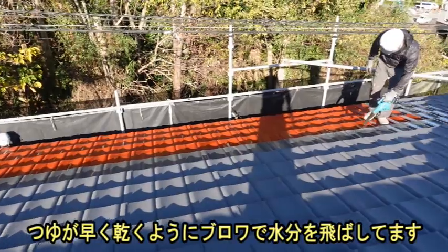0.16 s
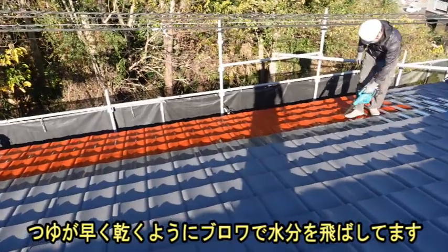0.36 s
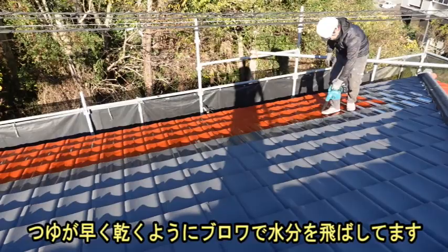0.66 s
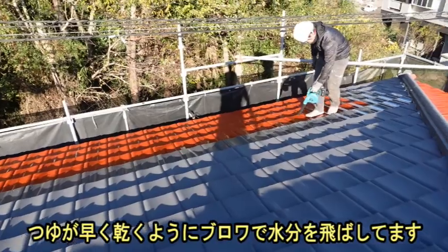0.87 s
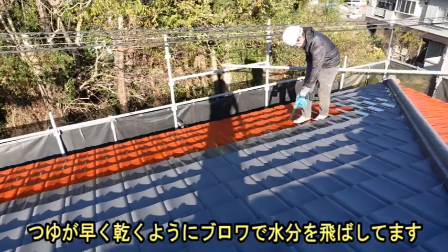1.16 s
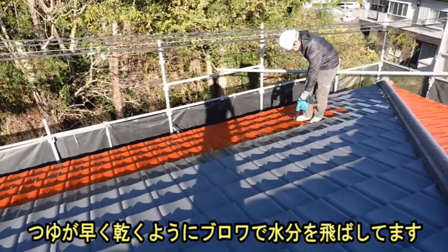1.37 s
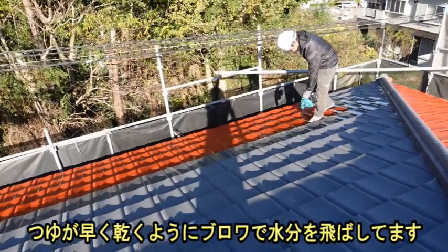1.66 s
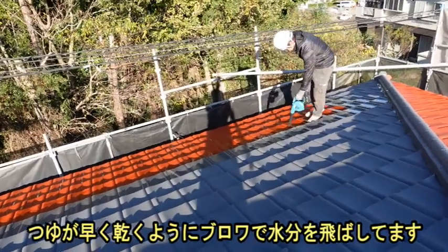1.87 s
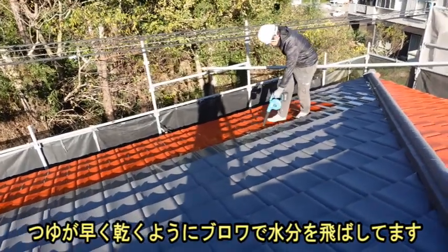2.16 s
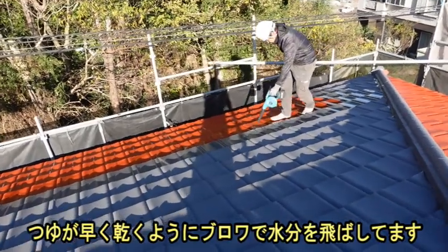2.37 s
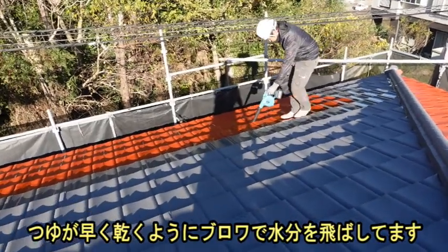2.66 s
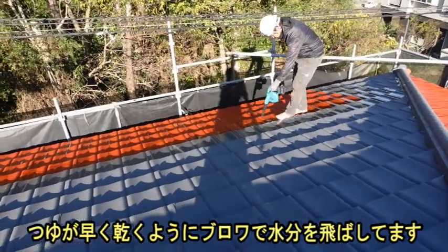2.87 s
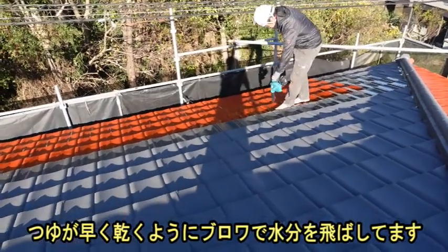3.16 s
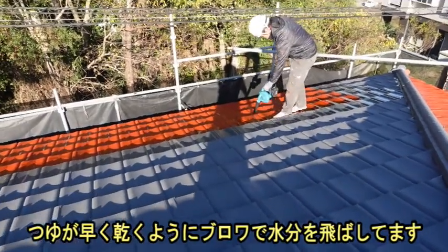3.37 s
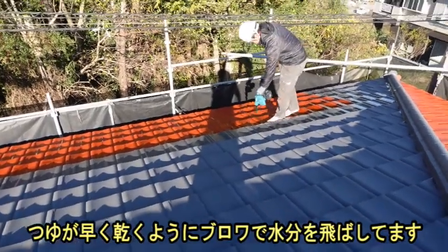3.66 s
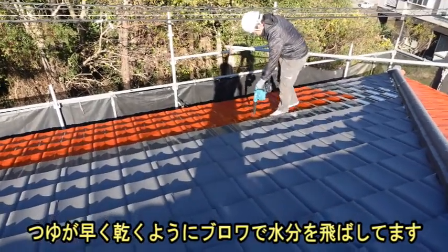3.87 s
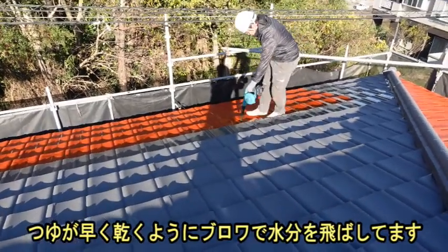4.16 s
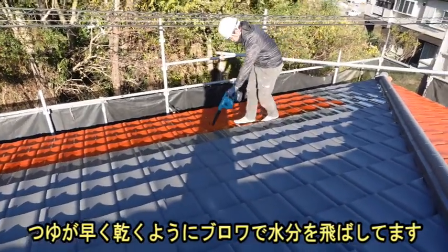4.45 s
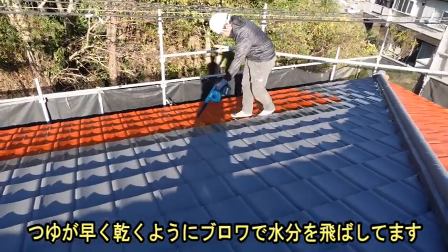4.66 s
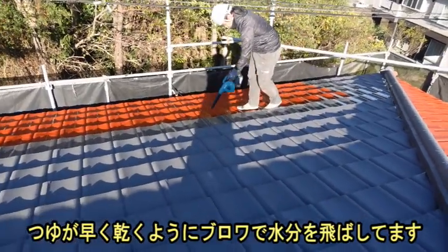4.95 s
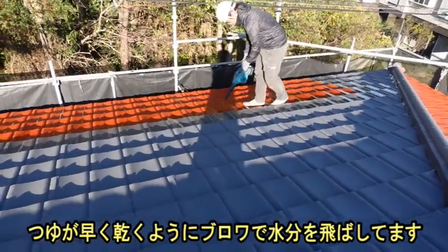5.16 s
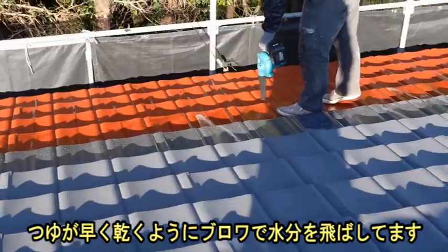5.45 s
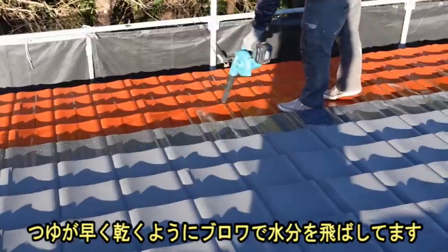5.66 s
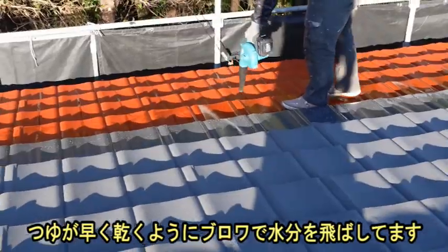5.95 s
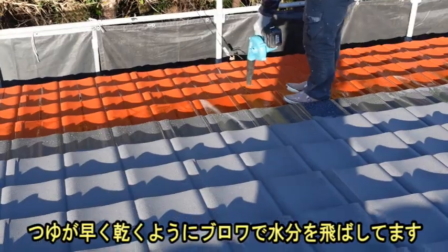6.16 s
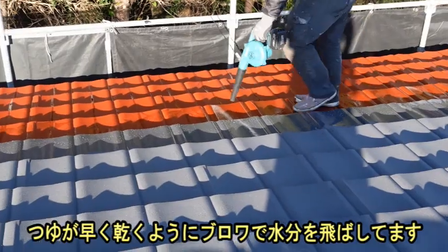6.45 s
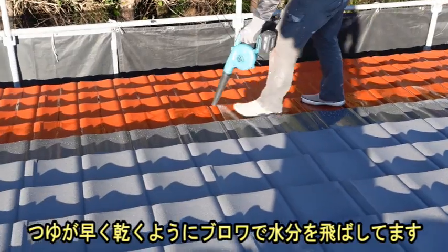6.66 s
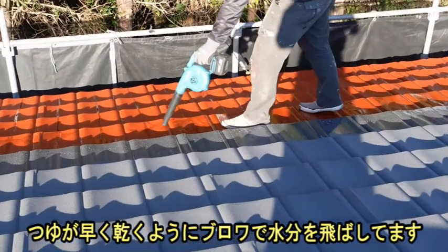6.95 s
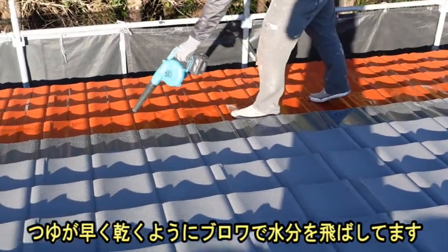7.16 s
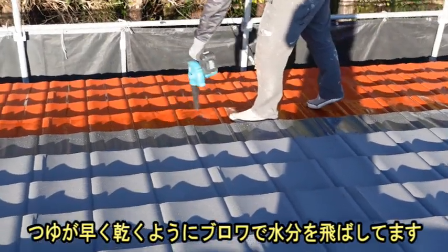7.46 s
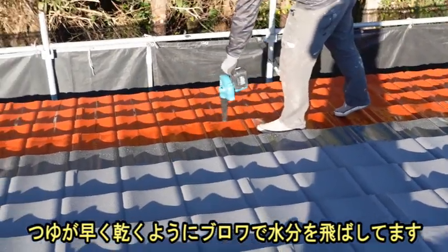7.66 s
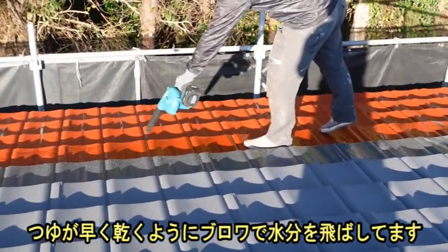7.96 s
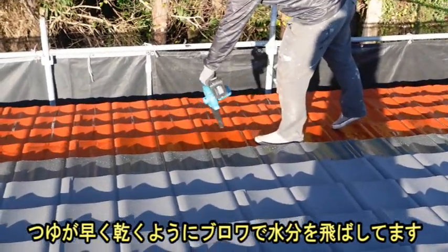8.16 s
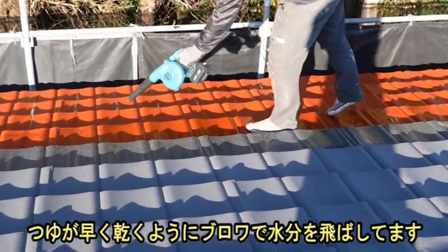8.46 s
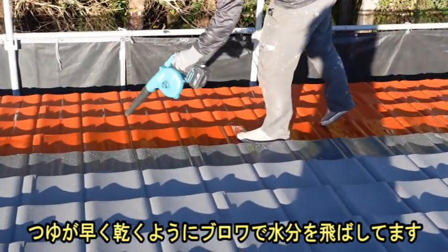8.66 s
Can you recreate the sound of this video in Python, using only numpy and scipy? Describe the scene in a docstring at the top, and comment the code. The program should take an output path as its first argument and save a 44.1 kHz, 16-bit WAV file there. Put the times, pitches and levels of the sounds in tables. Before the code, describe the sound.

A cordless blower runs outdoors on a tiled metal roof, its high fan whine riding over rushing, hissing air. It dips briefly, returns to full speed, then slows for longer with a thin squeal. The speed jumps with a faint thump and climbs again, dips once more and finally starts winding down. The sound drifts from slightly right to the middle, with almost no echo.

```python
"""Outdoors on a tiled metal roof, a cordless blower dries the tiles, its trigger squeezed and eased.
The nine-bladed fan whines over air that howls at the intake, rushes through duct and nozzle and roars
on the tiles. Pitch and loudness ride the shaft speed; at low speed a thin squeal comes out, probably
from a bearing. Partway through, the speed leaps up at once with a soft thump."""
import sys
import numpy as np
from scipy import signal
from scipy.fft import rfft, irfft
from scipy.io import wavfile
from scipy.ndimage import uniform_filter1d

SR = 44100
rng = np.random.default_rng(int(sys.argv[2]) if len(sys.argv) > 2 else 0)


def log_audio(samples):
    """Write samples as a 16-bit WAV file to the path given in sys.argv[1]."""
    # one column per channel
    frames = np.atleast_2d(samples).T
    # limit to full scale, then quantise
    limited = np.clip(frames, -1, 1)
    pcm = np.round(limited * 32767).astype(np.int16)
    wavfile.write(sys.argv[1], SR, pcm)


N = 388006
HOP = 256
TIME = np.arange(N) / SR
FRAMES = np.arange(N // HOP + 5) * HOP / SR
BINS = np.fft.rfftfreq(4 * HOP, 1 / SR)
START_HZ, FULL_HZ, COAST_HZ = 219.3, 273.3, 70.5  # turns per second: at first, flat out, coasting target
SPIN_UP_S, COAST_S = 0.195, 0.78  # motor lag with the trigger squeezed and let go
CUT_S, LEAP_HZ, LEAP_TRIM_DB = 5.266, 199.5, -2.8  # the leap: when, to what speed, trim from then on
AIR_LAW_DB, WHINE_LAW_DB, HUM_LAW_DB = 55, 63, 37  # growth per tenfold shaft speed


def amp(db):
    """Decibels to gain."""
    return 10 ** (np.asarray(db) / 20)


def unit(x):
    """Scales to rms 1."""
    return x / np.sqrt(np.mean(x ** 2) + 1e-20)


def follow(rows, at):
    """Every column of an automation curve, read at the given points."""
    knots, *columns = np.transpose(rows)
    return [np.interp(at, knots, column) for column in columns]


def colour(points):
    """An EQ curve in dB on the bins."""
    hz, db = np.transpose(points)
    return np.interp(np.log(BINS + 1), np.log(hz), db)


def bell(hz, centre_hz, width_hz):
    """The shape of a resonance, 1 at its centre."""
    return 1 / (1 + (2 * (hz - centre_hz) / width_hz) ** 2)


def swept_bell(rows, width_hz):
    """The lift in dB of one moving resonance, frames by bins."""
    hz, lift = follow(rows, FRAMES)
    return lift[:, None] * bell(BINS, hz[:, None], width_hz)


def wander(rate_hz):
    """Smooth random modulation of rms 1, moving up to about the given rate."""
    hz = np.fft.rfftfreq(N, 1 / SR)
    return unit(irfft(rfft(rng.standard_normal(N)) * np.exp(-(hz / rate_hz) ** 2), N))


def patches(frames, bins):
    """Random lumps of rms 1 in time and frequency."""
    field = rng.standard_normal((len(FRAMES), len(BINS)))
    return unit(uniform_filter1d(uniform_filter1d(field, frames, axis=0), bins, axis=1))


def noise(db):
    """Noise of rms 1 whose spectrum in dB may change from frame to frame."""
    real, imag = rng.standard_normal((2, len(FRAMES), len(BINS)))
    spectrum = (real + 1j * imag) * amp(db)
    return unit(signal.istft(spectrum.T, nperseg=4 * HOP, noverlap=3 * HOP)[1][:N])


# Colour of the outdoor bed. Each row: frequency in Hz, relative level in dB.
OUTDOOR_EQ = [(20, -16), (60, -3), (120, -9), (300, 7.5), (1000, 6), (4000, -79), (16000, -46)]

def outdoors():
    """A faint, dull bed of noise, independent left and right."""
    return amp(-65) * np.array([noise(colour(OUTDOOR_EQ)) for _ in range(2)])


def thump():
    """One soft, low push and pull as the speed leaps."""
    angle = 2 * np.pi * 170 * (TIME - CUT_S)
    return amp(-59) * angle * np.exp((1 - angle ** 2) / 2)


# Trigger moves. Each row: start in seconds, target speed in turns per second, lag in seconds.
TRIGGER_MOVES = [(0, FULL_HZ, SPIN_UP_S), (.7, 202, .27), (1.276, FULL_HZ, SPIN_UP_S), (3.72, 194, .22),
                 (4.79, COAST_HZ, COAST_S), (CUT_S, 185, .5), (5.527, FULL_HZ, SPIN_UP_S),
                 (6.21, COAST_HZ, COAST_S), (6.43, FULL_HZ, SPIN_UP_S), (8.416, COAST_HZ, COAST_S)]

def shaft_speed(t):
    """Turns per second: after each trigger move the motor glides towards its new speed."""
    speed, start_hz = np.zeros(len(t)), START_HZ
    ends = [row[0] for row in TRIGGER_MOVES[1:]] + [t[-1]]
    for (start, target_hz, lag), end in zip(TRIGGER_MOVES, ends):
        if start == CUT_S:
            start_hz = LEAP_HZ
        after = t >= start
        speed[after] = target_hz + (start_hz - target_hz) * np.exp(-(t[after] - start) / lag)
        start_hz = target_hz + (start_hz - target_hz) * np.exp(-(end - start) / lag)
    return speed


def drive(law_db):
    """Gain that rides a power of the shaft speed, trimmed from the leap on."""
    return amp(law_db * np.log10(shaft_speed(TIME) / FULL_HZ) + LEAP_TRIM_DB * (TIME >= CUT_S))


# Where the squeal speaks. Each row: shaft speed in turns per second, level before the leap in dB.
SQUEAL_LEVELS = [(150, -82), (157, -59), (190, -57), (213, -49), (226, -56), (250, -84)]

def squeal():
    """A thin, unsteady tone, probably a bearing, shaken once a turn; fainter after the leap."""
    speed = shaft_speed(TIME)
    level_db, = follow(SQUEAL_LEVELS, speed)
    knee_hz = 190  # above this shaft speed the pitch climbs more slowly
    hz = 59.7 * np.minimum(speed, knee_hz) + 27 * np.maximum(speed - knee_hz, 0)
    shake = 0.41 * np.sin(2 * np.pi * np.cumsum(speed) / SR)
    phase = 2 * np.pi * np.cumsum(hz + 45 * wander(20) + 65 * wander(430)) / SR
    flutter = amp(1.6 * wander(120) + 2.9 * wander(16))
    return amp(level_db - 5 * (TIME >= CUT_S)) * unit(flutter * np.sin(phase + shake))


# Air resonances of casing and tube. Each row: centre in Hz, width in Hz, lift in dB.
CASING_RESONANCES = [(402, 165, 6), (628, 52, 4), (1041, 130, 8.5), (1263, 115, 3.5), (1380, 74, 5.5),
                     (1687, 320, 5.5), (1850, 144, -3), (2083, 130, -2), (2670, 110, 2.5), (2800, 90, 3),
                     (2905, 100, 3), (3180, 150, 3), (3520, 140, 2), (3980, 150, 2), (4680, 330, 3),
                     (5460, 310, 2), (6320, 400, 2.5), (7770, 530, 1), (10050, 400, 1.5)]

def airflow(db, drift_db, eddy_db, comb_db):
    """Turbulence coloured by the casing; eddies make it flicker and roof reflections comb it."""
    db = db + sum(lift * bell(BINS, hz, width) for hz, width, lift in CASING_RESONANCES)
    db = db - 10 * np.log10(np.sum(amp(db) ** 2, axis=1, keepdims=True))  # equal power in each frame
    drift = drift_db * patches(frames=36, bins=10)
    comb = comb_db * patches(frames=20, bins=3)
    eddies = eddy_db * patches(frames=6, bins=36)
    return noise(db + drift + comb + eddies)


# The howl's two humps. Each row: frequency in Hz, relative level in dB.
HOWL_EQ = [(2300, -25), (2550, -10), (2660, -3), (2820, 0), (2930, -1), (3040, -4), (3170, -2), (3270, -6),
           (3380, -16), (3700, -28)]
# The intake turning. Each row: time in seconds, relative level in dB, favoured frequency in Hz.
HOWL_MOVES = [(0.0, -32.5, 2600), (0.38, -35.5, 2620), (0.46, -50, 2800), (1.2, -45, 2950),
              (1.37, -33, 2780), (1.86, -42, 2690), (2.19, -38.5, 3100), (2.76, -37.5, 2750),
              (2.89, -35, 2980), (3.65, -47, 2960), (3.91, -35, 3220), (4.25, -32, 2650), (4.85, -38, 2720),
              (6.11, -26.5, 3190), (6.47, -37.5, 2800), (7.33, -30, 2880), (7.63, -35.5, 3235),
              (7.92, -28, 3100), (8.25, -39, 3320), (8.42, -28, 2830), (8.63, -36.5, 2820),
              (8.79, -31.0, 2900)]

def intake_howl():
    """Air howls into the intake; which hump leads changes as the intake turns."""
    level_db, _ = follow(HOWL_MOVES, TIME)
    _, centre_hz = follow(HOWL_MOVES, FRAMES)
    favour_db = 20 * np.log10(bell(BINS, centre_hz[:, None], width_hz=660))
    howl = airflow(colour(HOWL_EQ) + favour_db, drift_db=0.5, eddy_db=1.55, comb_db=1.5)
    return drive(AIR_LAW_DB) * amp(level_db - 1.43) * howl


# Faders that follow the tool's aim. Each row: time in seconds, relative jet, duct and hiss levels in dB.
AIR_FADERS = [(0.0, -46, -39.5, -30.5), (0.69, -45, -34, -29), (1.19, -43.5, -36, -31.5),
              (1.86, -43.5, -38, -30.0), (1.94, -43.5, -38.5, -28.5), (2.12, -45, -35.5, -28.0),
              (2.38, -44.5, -36.5, -29), (2.58, -46, -34, -26.0), (3.06, -45.5, -34.0, -30.5),
              (3.27, -43.5, -34.5, -29.0), (5.58, -41.5, -34, -31.0), (5.72, -45, -35.5, -29.5),
              (6.51, -45, -33.5, -29.0), (6.71, -35, -30.5, -27.5), (7.01, -36.5, -30.5, -28),
              (7.12, -47, -35, -26), (7.39, -47.5, -36.5, -30), (8.0, -47, -34, -29),
              (8.08, -45.5, -37, -27.5), (8.79, -41, -33, -32.5)]
# Colours of jet, duct and nozzle hiss. Each row: frequency in Hz, relative level in dB.
JET_EQ = [(40, -40), (100, -31), (150, -26), (210, -13), (300, -7), (400, -2), (520, -1.5), (700, 3.5),
          (900, 2.5), (1200, 0.5), (1800, -23.5), (4000, -23)]
DUCT_EQ = [(500, -59), (850, -10.5), (1020, -7.5), (1300, -1), (1550, -4.5), (2000, -7.5), (2400, -1.5),
           (2800, -1), (3500, -30.5), (6000, -31)]
NOZZLE_EQ = [(1200, -36), (2000, 3), (2800, -5), (3350, -1.5), (3550, 1), (4200, -1.5), (4800, 0),
             (5800, -3), (7000, -7.5), (8800, -12.5), (10400, -14.5), (12500, -19.5), (15700, -32.5)]
# Moving resonances of the gap between nozzle and tiles, the duct and the nozzle.
# Each row: time in seconds, centre in Hz, lift in dB.
GAP_SWEEP = [(.3, 430, 5), (.9, 600, 2), (2.4, 420, 1.5), (2.95, 576, 3.5), (5.1, 387, 2), (6.4, 880, 0),
             (6.75, 770, 15), (7.1, 810, 2), (7.55, 480, 6), (8.3, 550, 3), (8.7, 960, 4)]
DUCT_SWEEP = [(.7, 1220, 6.9), (1.4, 1420, 6), (2.5, 1710, 7), (3.1, 1580, 2.3), (3.5, 1350, 5),
              (4.2, 2100, 3.6), (5.9, 1750, 1.5), (6.3, 1060, 3), (7, 1290, 2.2), (8.7, 1010, 1.6)]
NOZZLE_SWEEP = [(.1, 5030, 6), (.35, 5400, -3.5), (.55, 5800, 2.5), (1.1, 4800, -4.5), (2.45, 5900, 2),
                (2.58, 5640, 11), (2.78, 5170, 6), (2.9, 5000, -1), (3.15, 3730, 3), (4, 3600, 4.5),
                (4.3, 4960, -0.5), (4.9, 4550, 5), (5.3, 5200, -1.5), (6.1, 4360, 1), (7, 5970, 8.5),
                (7.3, 5270, 1), (7.55, 3400, 0.5), (8.2, 3850, 7), (8.7, 5260, -1)]
# The hiss brightens and dulls with the nozzle's aim. Each row: time in seconds, treble lift in dB.
HISS_SHELF = [(0, -2), (.6, 0), (1.4, -2.5), (2.4, 1.5), (3.5, 1.5), (4.8, 0.5), (5.3, -3), (6.2, 0),
              (7.1, 1.5), (8.2, -1.5), (8.8, -0.5)]

def air_rush():
    """The jet roars on the tiles, the duct rushes and the nozzle hisses, swelling with shaft speed."""
    jet_db, duct_db, hiss_db = follow(AIR_FADERS, TIME)
    speed = shaft_speed(FRAMES)[:, None]
    # at low speed a sizzle near forty times the shaft rate stands out of the hiss
    slowness = np.clip((250 - speed) / 50, 0, 1)
    sizzle_db = 6 * slowness * bell(BINS, 40 * speed, width_hz=0.88 * speed)
    treble_db = follow(HISS_SHELF, FRAMES)[0] + 0.45 * np.interp(FRAMES, TIME, wander(14))
    shelf_db = np.outer(treble_db, np.clip((BINS - 5500) / 2500, 0, 1))
    jet_eq = colour(JET_EQ) + swept_bell(GAP_SWEEP, width_hz=280)
    duct_eq = colour(DUCT_EQ) + swept_bell(DUCT_SWEEP, width_hz=270)
    hiss_eq = colour(NOZZLE_EQ) + swept_bell(NOZZLE_SWEEP, width_hz=1000) + shelf_db + sizzle_db
    jet = amp(jet_db + 0.65) * airflow(jet_eq, drift_db=0.94, eddy_db=-0.2, comb_db=2.0)
    duct = amp(duct_db - 0.12) * airflow(duct_eq, drift_db=1.7, eddy_db=0.64, comb_db=1.0)
    hiss = amp(hiss_db - 0.96) * airflow(hiss_eq, drift_db=1.1, eddy_db=1.0, comb_db=1.73)
    return drive(AIR_LAW_DB) * (jet + duct + hiss)


# The once-a-turn hum as the casing turns. Each row: time in seconds, relative level in dB.
HUM_FADER = [(0, -58), (.6, -73), (.95, -58), (1.4, -65.5), (2.6, -69.5), (3.4, -58.5), (4.1, -62.5),
             (5.3, -68), (6.1, -62.5), (6.5, -66.5), (7.3, -58), (8.5, -59.5)]
# Relative levels in dB of the hum's second and third harmonics.
HUM_OVERTONES_DB = [-63, -63.5]

def shaft_hum(speed, angle):
    """Three shaft harmonics; any that passes through the tube's resonance blooms."""
    hum = 0
    for k, db in enumerate(follow(HUM_FADER, TIME) + list(HUM_OVERTONES_DB), 1):
        tube_db = 14.3 * bell(k * speed, centre_hz=638, width_hz=70)
        bass_loss_db = 10 * np.log10(1 + (185 / (k * speed)) ** 16)  # a small casing radiates few lows
        gain = amp(db + tube_db - bass_loss_db + 2.6 * wander(4.1))
        hum = hum + gain * np.sin(k * (angle + 0.29 * wander(51)))  # higher harmonics shake more
    return drive(HUM_LAW_DB) * hum


BLADES = 9
# The blade tone beams as the tool swings about. Each row: time in seconds, relative level in dB.
WHINE_FADER = [(0, -37), (.46, -31), (.98, -46), (1.04, -36.5), (1.95, -38), (2.08, -22.5), (2.59, -24),
               (2.72, -40), (2.87, -27), (2.92, -39), (3.08, -24), (3.33, -41), (3.46, -31), (4.69, -46),
               (5.23, -23), (5.28, -36), (5.65, -34.5), (5.9, -47), (6.17, -38), (6.5, -35), (6.72, -30),
               (6.95, -38), (7.08, -26), (7.2, -39.5), (7.33, -25), (7.44, -30), (7.6, -25.5), (7.9, -33.5),
               (8.1, -27.5), (8.37, -33), (8.43, -42), (8.62, -34), (8.79, -51)]

def blade_whine(angle):
    """The blade tone and its octave; the tone beats with its glance off the roof and flickers."""
    whine_db, = follow(WHINE_FADER, TIME)
    glance_db = np.minimum(whine_db - 3, -37)
    glance = amp(glance_db) * (wander(10.6) + 1j * wander(10.6)) / np.sqrt(2)
    direct = amp(whine_db - 1 + 1.1 * wander(41))
    phase = BLADES * angle + 0.048 * wander(150)
    tone = np.imag((direct + glance) * np.exp(1j * phase))
    octave = amp(whine_db - 27.0 + 4.7 * wander(9.2)) * np.sin(2 * BLADES * angle)
    return drive(WHINE_LAW_DB) * (tone + octave)


def fan():
    """Whine and hum locked to one turning shaft; uneven inflow makes them tremble."""
    speed = shaft_speed(TIME)
    tremble = 1 + 0.00055 * wander(37) + 0.001375 * wander(2.98)
    angle = 2 * np.pi * np.cumsum(speed * tremble) / SR
    return np.sqrt(2) * (blade_whine(angle) + shaft_hum(speed, angle))


def roof_scatter(blower):
    """The side signal: faint, short reflections off roof and scaffold, and width in the treble."""
    t = np.arange(SR // 16) / SR
    taps = rng.standard_normal(len(t)) * np.exp(-t / 0.012)
    echo = signal.fftconvolve(blower, taps / np.linalg.norm(taps))[:N]
    return amp(-36.5) * echo + amp(-30.5) * np.gradient(blower)


def scene():
    """The blower drifts from a little right to the middle, over the outdoor bed."""
    low_cut = signal.butter(2, 97, "high", fs=SR, output="sos")
    air = signal.sosfilt(low_cut, air_rush() + intake_howl())
    blower = air + fan() + squeal() + thump()
    pan_db = -0.1 - 2.9 * np.exp(-TIME / 1.35)  # left against right
    side = roof_scatter(blower)
    left = blower * amp(pan_db / 2) + side
    right = blower * amp(-pan_db / 2) - side
    return np.array([left, right]) + outdoors()


def record(dry):
    """A steep high cut takes off the very top."""
    high_cut = signal.firwin(1023, 15780, window=("kaiser", 9), fs=SR)
    return signal.oaconvolve(dry, high_cut[None], "same")


dry = scene()
out = record(dry)
log_audio(out)
```